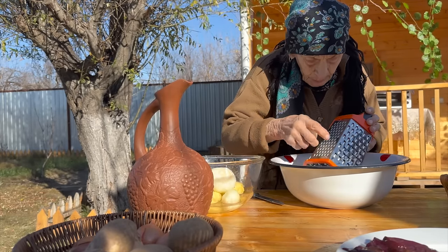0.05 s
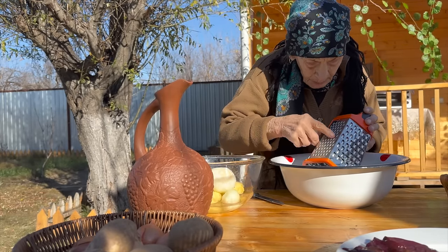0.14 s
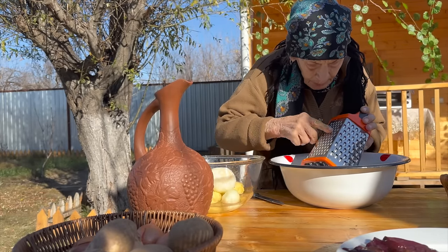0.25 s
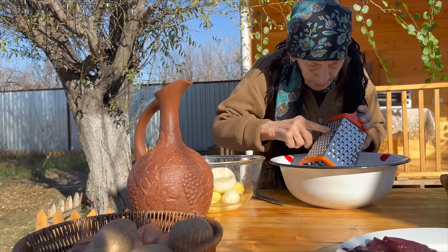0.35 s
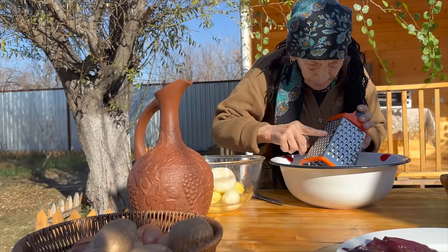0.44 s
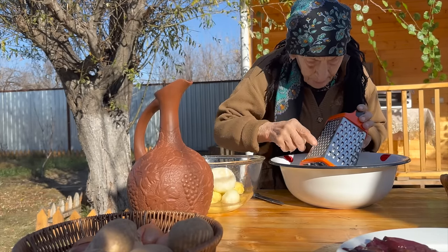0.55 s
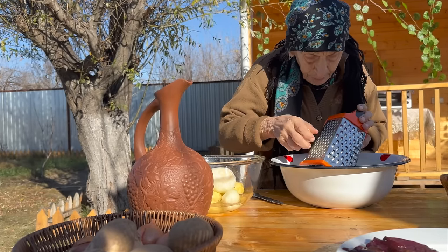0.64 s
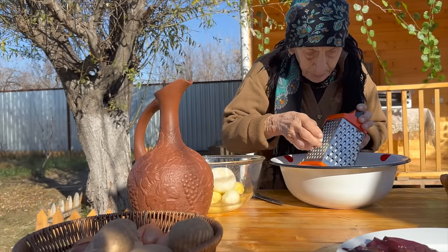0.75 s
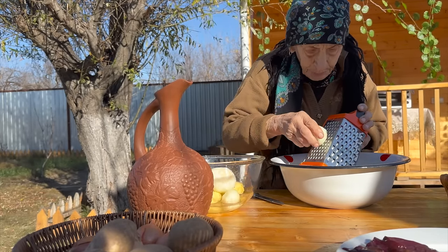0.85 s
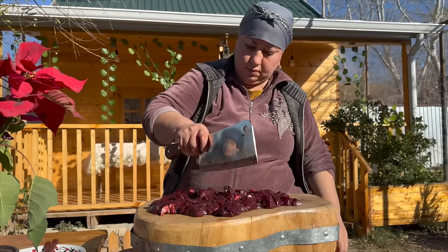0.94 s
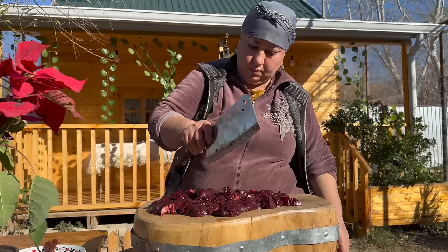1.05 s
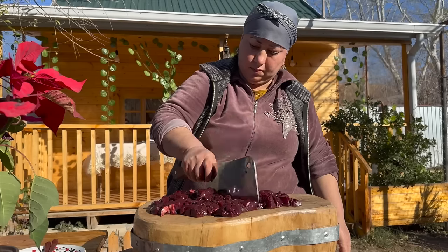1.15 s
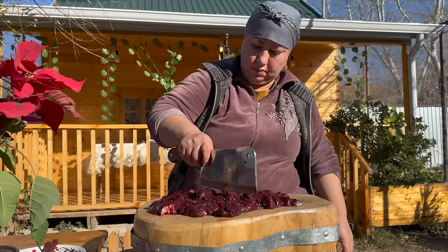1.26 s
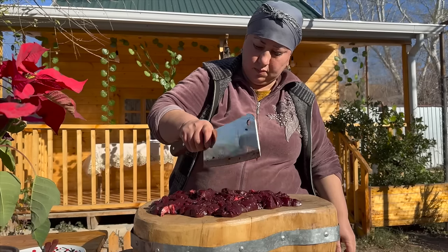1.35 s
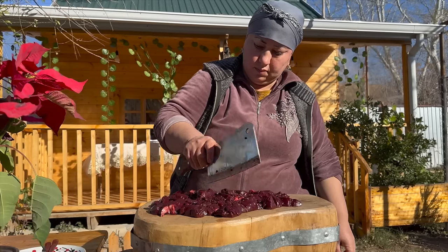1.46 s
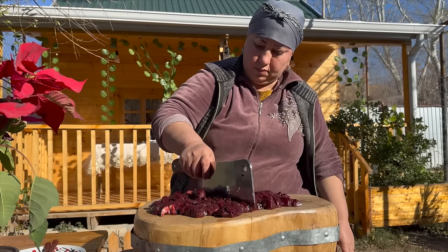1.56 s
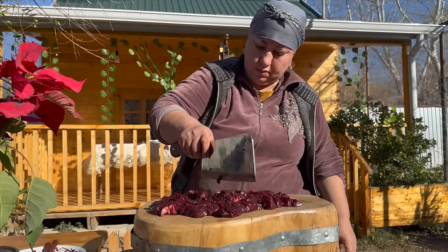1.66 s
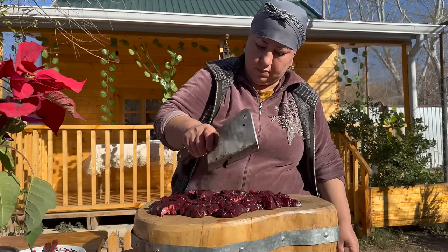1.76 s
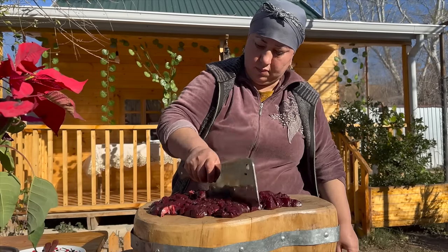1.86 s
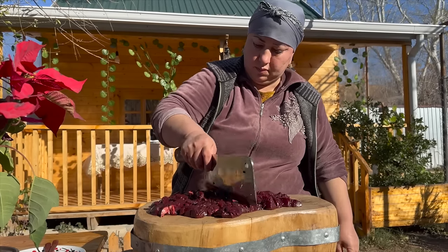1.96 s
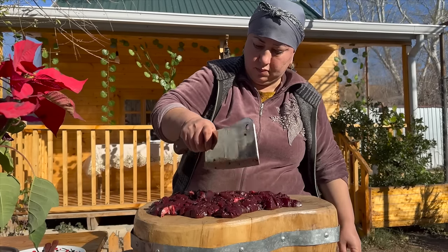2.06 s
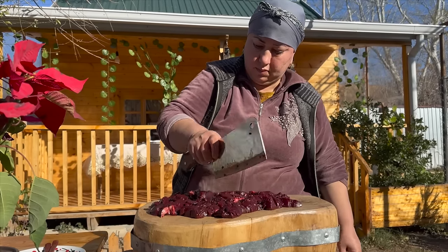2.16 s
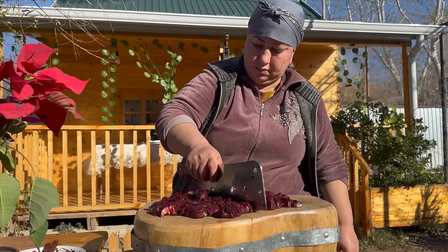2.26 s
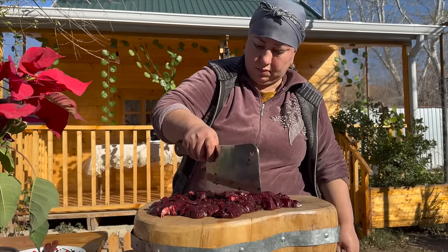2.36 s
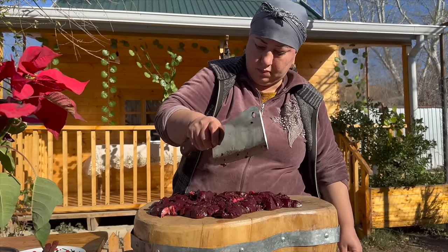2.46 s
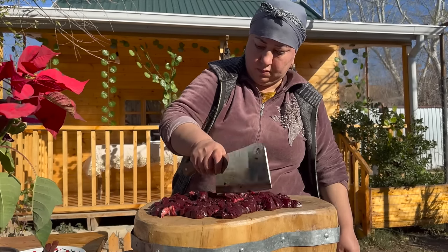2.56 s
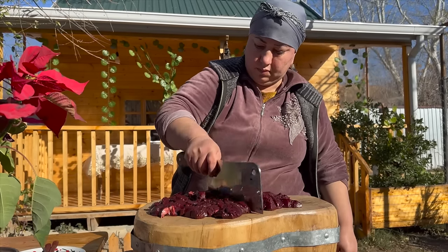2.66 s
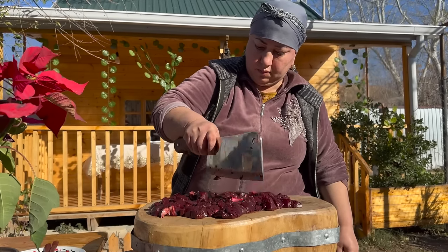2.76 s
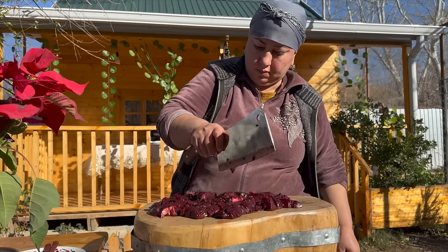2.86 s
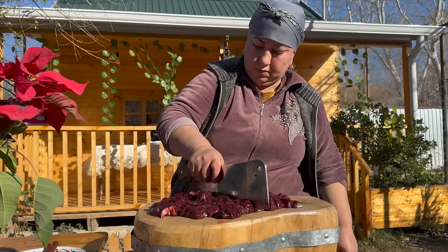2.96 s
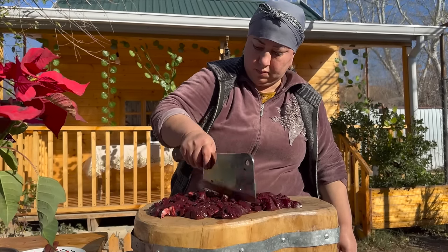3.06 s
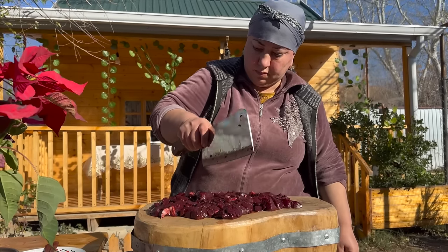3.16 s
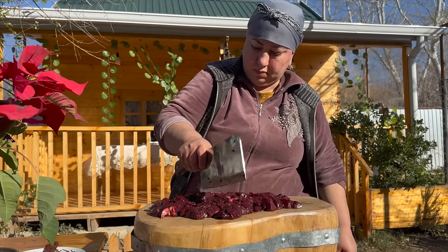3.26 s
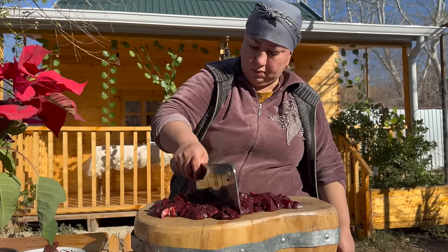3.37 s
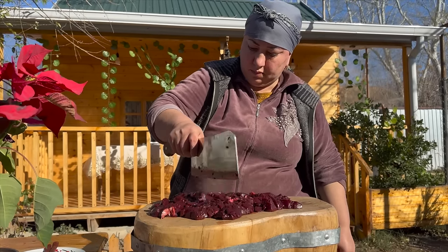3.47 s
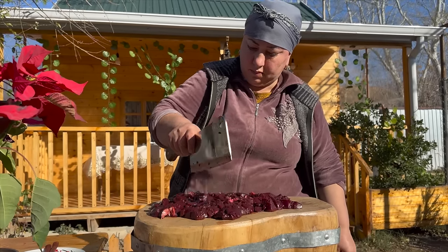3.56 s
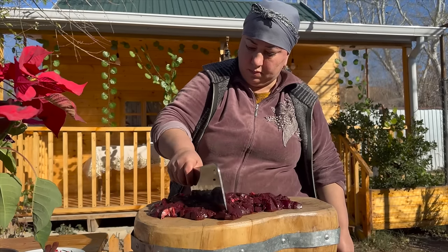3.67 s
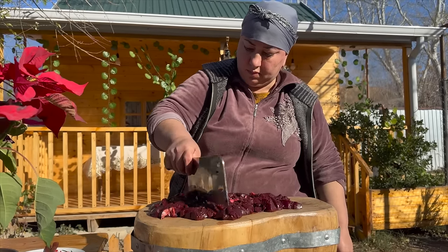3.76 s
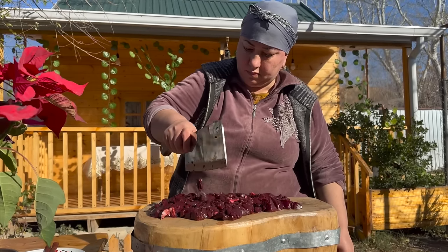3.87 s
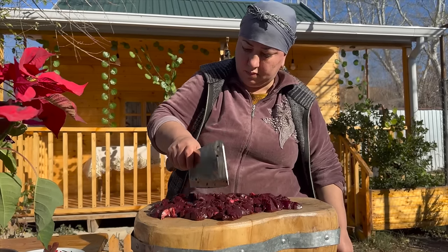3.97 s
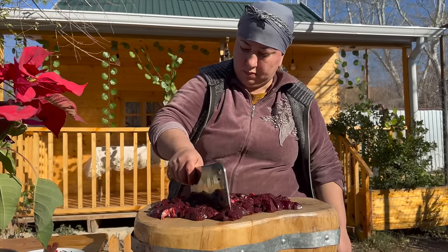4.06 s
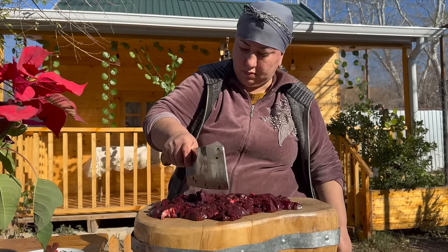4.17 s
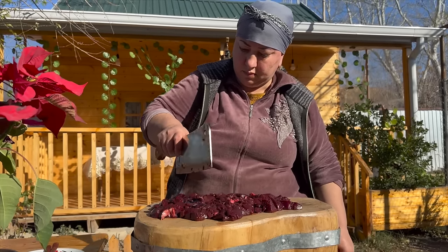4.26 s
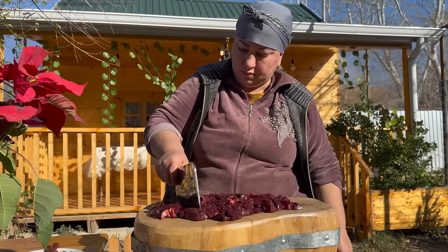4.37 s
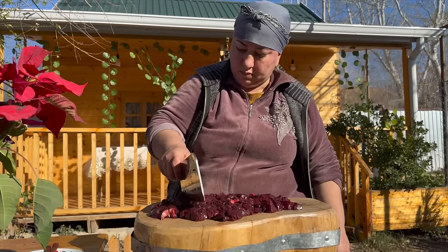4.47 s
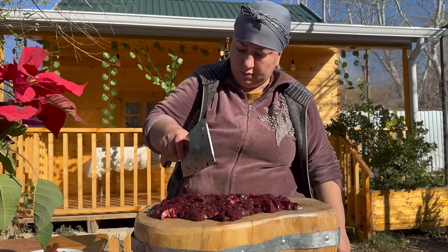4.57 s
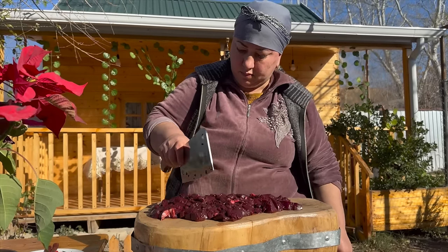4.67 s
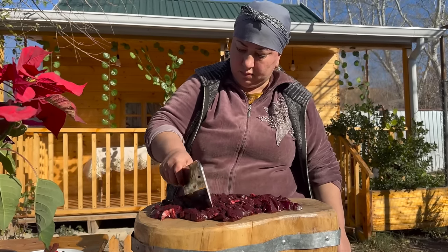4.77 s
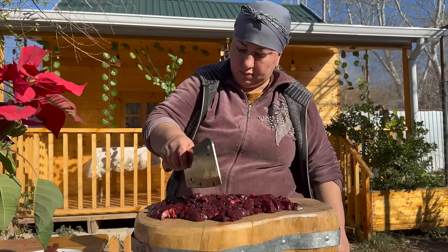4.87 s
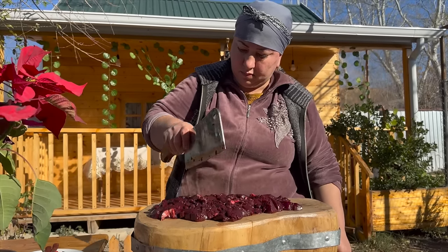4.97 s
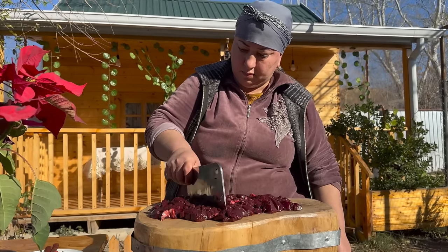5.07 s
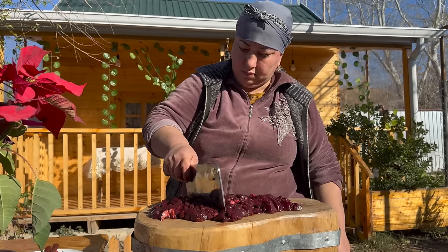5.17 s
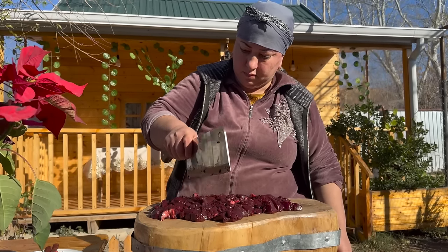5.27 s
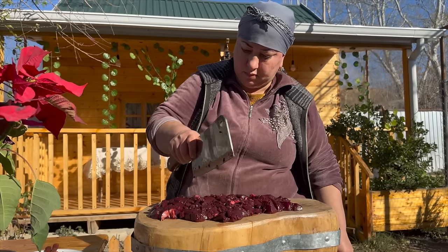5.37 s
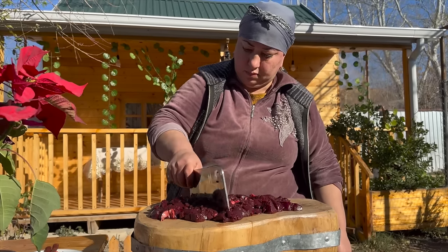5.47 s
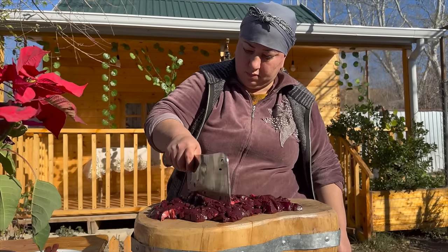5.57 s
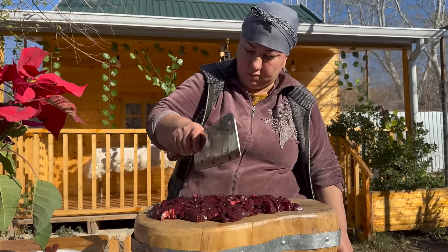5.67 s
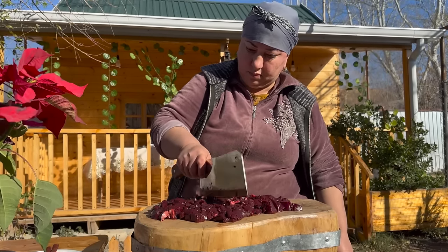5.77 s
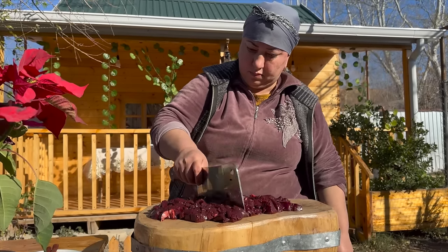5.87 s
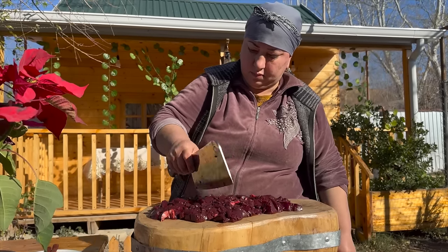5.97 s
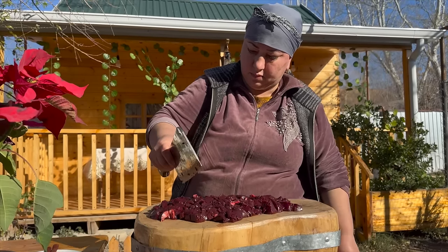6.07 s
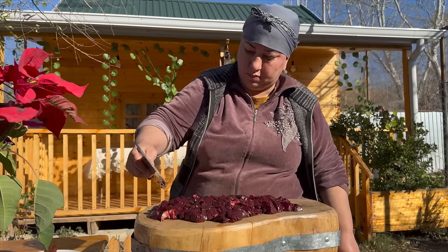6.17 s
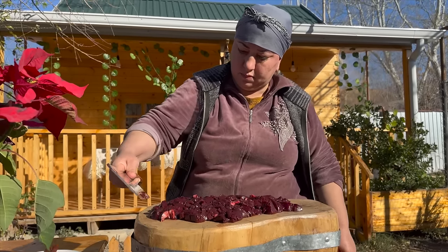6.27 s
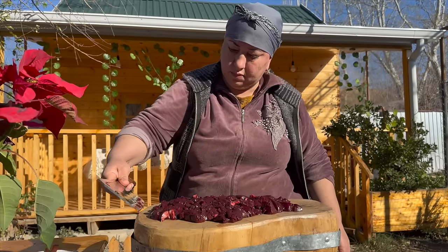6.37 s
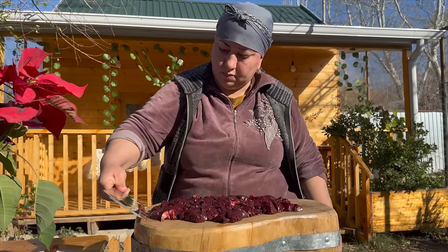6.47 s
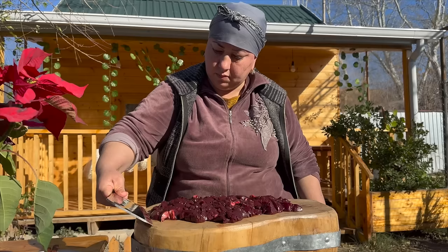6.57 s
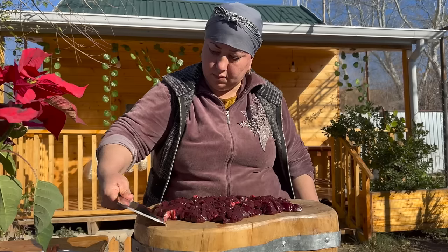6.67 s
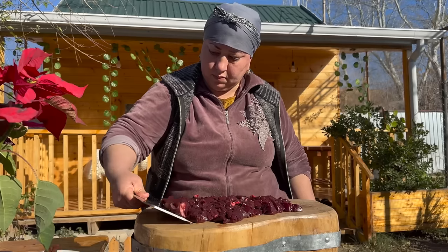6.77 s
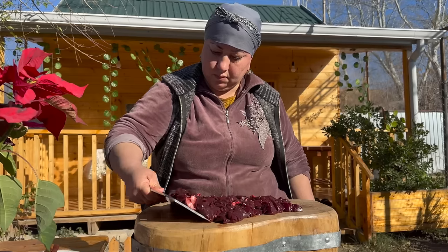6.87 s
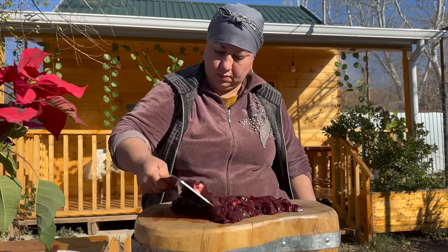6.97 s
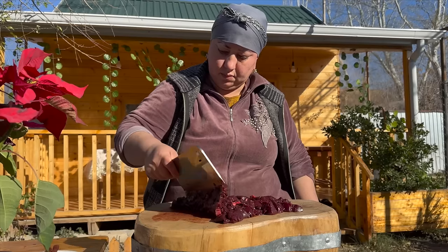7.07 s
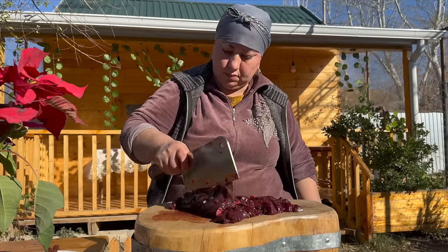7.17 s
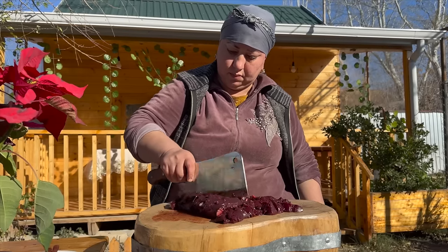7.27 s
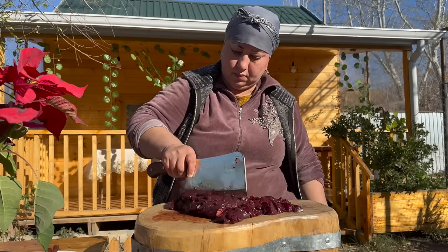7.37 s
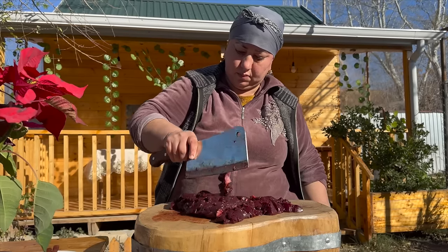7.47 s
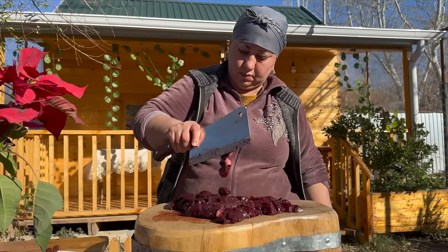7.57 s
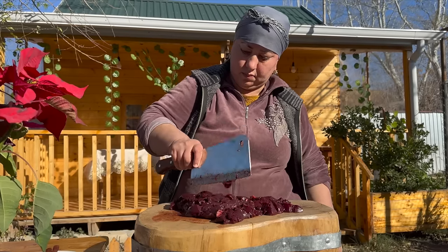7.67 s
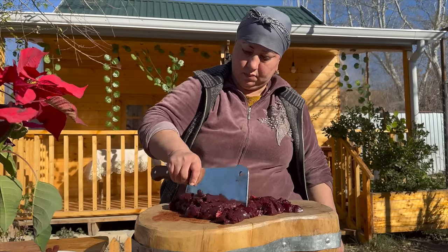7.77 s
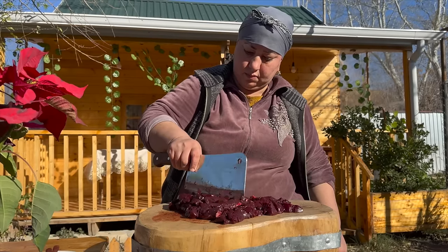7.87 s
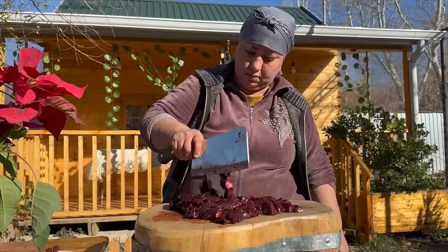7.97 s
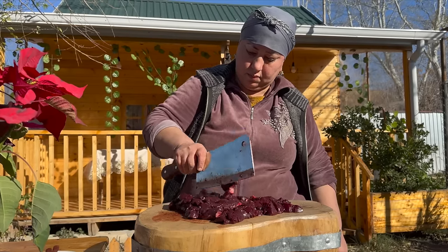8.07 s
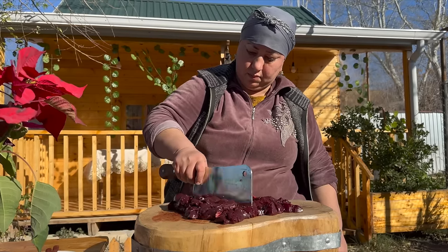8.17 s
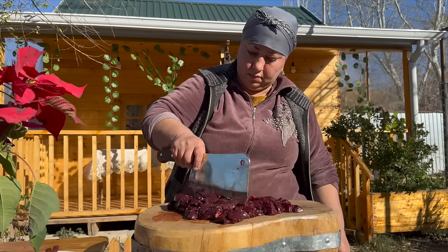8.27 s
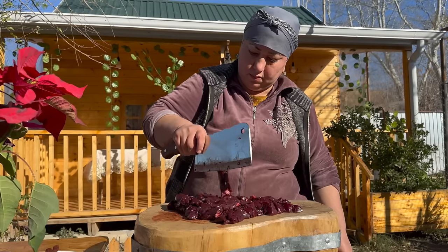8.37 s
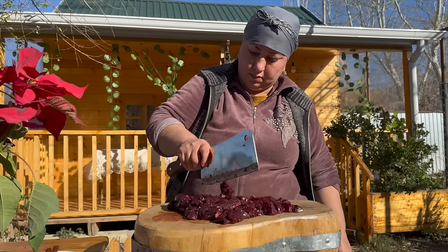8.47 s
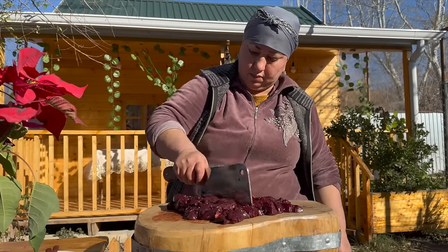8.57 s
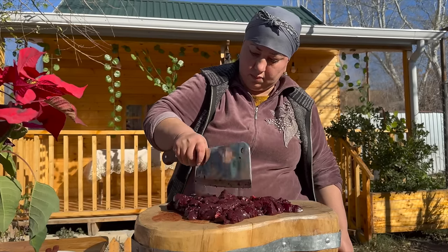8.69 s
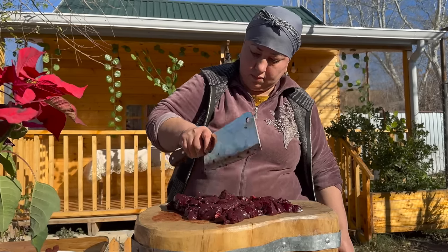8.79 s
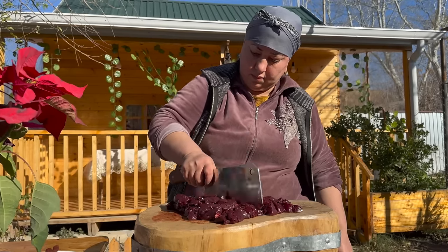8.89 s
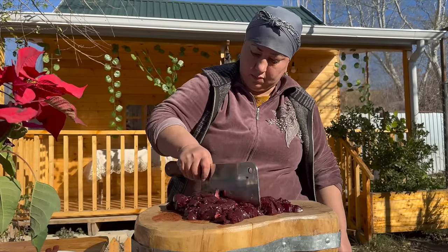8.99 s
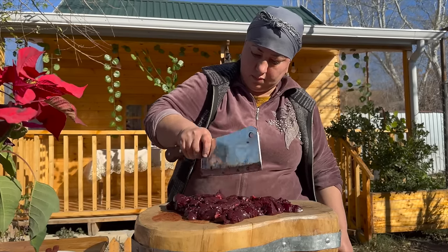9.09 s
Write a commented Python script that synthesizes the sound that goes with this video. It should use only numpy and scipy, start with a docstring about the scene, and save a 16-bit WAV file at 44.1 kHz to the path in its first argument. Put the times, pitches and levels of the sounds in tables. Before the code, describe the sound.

A cleaver steadily chops wet raw liver on a thick wooden block outdoors, pausing once to scrape, with light wind on the microphone.

```python
"""An onion rasps a last stroke over a box grater, then a cleaver chops raw liver on a thick wooden block.
Each chop squelches through the meat, knocks the wood and peels free; the block's stand booms and the
house front answers across the yard. Once, the blade clinks down and scrapes the pile together.
Underneath, light wind rumbles on the microphone, and early on a far bird whistles."""
import sys
import numpy as np
from scipy import signal
from scipy.fft import rfft, irfft, next_fast_len
from scipy.io import wavfile
from scipy.ndimage import uniform_filter1d, map_coordinates

SR = 44100
rng = np.random.default_rng(int(sys.argv[2]) if len(sys.argv) > 2 else 0)


def log_audio(samples):
    """Write samples as a 16-bit WAV file to the path given in sys.argv[1]."""
    # one column per channel
    frames = np.atleast_2d(samples).T
    # limit to full scale, then quantise
    limited = np.clip(frames, -1, 1)
    pcm = np.round(limited * 32767).astype(np.int16)
    wavfile.write(sys.argv[1], SR, pcm)


N = 402633
TIME = np.arange(N) / SR
AGE = np.arange(SR // 2) / SR  # seconds since a contact

# Cue levels are relative: each layer adds its own trim.
# cleaver hits: t/s, force/dB, bite into the wood/dB, squelch/dB, peeling free/dB
CHOP_CUES = [(1.1762, -25.5, 6, -52, -67.5), (1.5396, -27, 0.2, -47, -90), (1.8896, -30, 4, -44, -67.5),
             (2.2542, -31.5, 0.5, -42.5, -73), (2.6218, -25, 3.5, -50, -70.5),
             (2.988, -45.5, 4.5, -40, -69.5), (3.3331, -25, 2.5, -42.5, -73.5),
             (3.6804, -31.5, -1.5, -44.5, -64), (4.0375, -29.5, -2.5, -43.5, -62),
             (4.3917, -34.5, -5, -43, -98), (4.754, -61.5, 11, -44.5, -69.5),
             (5.1099, -22.5, 1.5, -43.5, -68.5), (5.4694, -24.5, 1, -41.5, -75),
             (5.8229, -27, -2, -43.5, -89), (7.752, -67, 17.5, -45, -61), (8.1527, -34, -1, -45, -71.5),
             (8.555, -61, 11, -45.5, -60), (8.9289, -28.5, 0.5, -43, -69.5)]
SNAP_CUES = [(1.172, -19), (1.2376, -44), (2.301, -42), (2.3226, -40.5), (2.7105, -41.5), (4.7403, -25),
             (4.8039, -43.5), (4.8384, -49.5), (6.9723, -50.5), (7.3284, -47.5)]  # the loudest wet films bursting: t/s, peak/dB
SHOVE_CUES = [(6.78, 0.064, -59), (6.89, 0.1917, -73.5), (7.24, 0.0673, -73.5), (7.41, 0.0447, -74)]  # meat shoved together and lifted: t/s, length/s, level/dB
SET_DOWN_CUES = [(6.5537, -37.5)]  # blade set down on the block: t/s, level/dB
CORNER_CUES = [(6.54, 0.0256, -48.5), (6.61, 0.152, -56)]  # blade corner sliding on the wood: t/s, length/s, level/dB
DRAG_CUES = [(6.63, 0.1722, -46.5)]  # edge pressed flat and dragged: t/s, length/s, level/dB
GRATE_CUES = [(0, 0.0982, -60.5), (.19, 0.064, -76.5), (.455, 0.0167, -75), (.505, 0.0262, -67)]  # onion strokes over the teeth: t/s, length/s, level/dB
BUMP_CUES = [(0.769, -57.5, 627, 0.074, -77), (0.803, -40, 183, 0.0333, -81.5),
             (0.9, -89.5, 900, 0.01, -68.5), (1.259, -47.5, 1500, .025, -67),
             (6.223, -46, 260, 0.0206, -66.5), (6.243, -67, 506, 0.044, -66.5)]  # handled things and falling scraps: t/s, level/dB, f/Hz, t60/s, rustle/dB
BIRD_CUES = [(.73, 0.091, 2207, 2195, -72.5), (.815, 0.072, 2196, 2185, -72.5),
             (1.312, .09, 3460, 4232, -66), (1.364, .13, 2964, 4163, -67)]  # far whistles: t/s, length/s, start f/Hz, end f/Hz, level/dB
WIND_CURVE = [(0.0, -56.5), (0.48, -50), (0.79, -56.5), (0.91, -44), (3.36, -42), (3.56, -50),
              (4.22, -39.5), (4.45, -48.5), (8.98, -49), (9.13, -56.5)]  # wind strength: t/s, level/dB

# struck modes: f/Hz, level/dB, t60/s
THUD_MODES = [(211.5, 3, 0.017), (405.3, -3, 0.021), (547, -4.5, 0.014)]  # low body of the block
CLONK_MODES = [(646.06, -7.5, 0.06), (890.3, 4, 0.029), (971, -4, .035)]  # top face of the block
KNOCK_MODES = [(1130, -3, 0.023), (1304.3, 0, 0.028), (1461, -1.5, .028), (1568, 3.5, 0.023),
               (1592.4, -18, 0.11), (1765, 0, 0.0073)]  # cleaver held against the wood
EDGE_MODES = [(2377.2, -7.5, 0.03), (2770, 1, 0.017), (3050, -1, .013), (3546, -4.5, 0.01),
              (3988.6, -3.5, 0.02), (5199, -7, 0.014), (5800, -6, 0.0059)]  # the cleaver's high, quickly damped ring
CLINK_MODES = [(533.4, -10, 0.111), (2463, 1.5, 0.063), (4036, -4.5, 0.0317), (6750, -24.5, 0.044)]  # blade ringing as it is set down

# resonances of rubbed metal: f/Hz, width/Hz, level/dB
CORNER_BANDS = [(260, 127, -10.5), (527.8, 50.3, 0), (900, 295, -14.5), (1435, 137, -12.5),
                (1920, 150, -18.5), (2573, 44.3, 3.5), (3106, 145, -15), (3814, 80, -7), (4470, 237, -13.5),
                (5700, 380, -20), (6602, 61, -14), (7310, 87, -20.5), (8980, 225, -26)]  # blade with only its corner on the wood
FLAT_BANDS = [(218.5, 74, -2.5), (542, 51, -10), (1362, 69.7, 4), (2184, 41, 2.5), (2454, 129, 2.5),
              (2970, 600, -3), (3546, 280, 1.5), (4023, 170, 1), (5394, 320, -4), (6725, 114, -3.5),
              (7065, 115, -5.5), (9500, 1050, -22.5)]  # blade pressed flat along its edge
GRATER_BANDS = [(260, 316, -4.5), (706, 80, 2.5), (1070, 396, -3), (2210, 88, -8), (2470, 67, 2.5),
                (3390, 118, -8), (3727, 76, 1), (4700, 97, -10.5), (4930, 120, -16.5), (5650, 237, -12),
                (6384, 142, -12), (7210, 183, -18), (8650, 140, -32)]  # the grater's sheet metal

# EQ curves: f/Hz, level/dB
CRACK_EQ = [(700, -19.5), (1500, 0.5), (2300, 3), (3000, 0), (4000, -3.5), (5500, -6), (7000, -12),
            (10000, -21), (16000, -27)]  # wood fibres cracking
SQUELCH_EQ = [(150, -16.5), (400, -9), (1000, 1), (2500, -1), (4000, -1), (6000, -8), (9000, -11),
              (15000, -11)]  # liver squeezed by the blade
PEEL_EQ = [(400, -25), (1500, -2.5), (3500, -7), (7000, -5), (10000, -3), (15000, -7.5)]  # wet meat pulling loose
RUMBLE_EQ = [(10, 0.5), (28, 3.5), (48, -5.5), (70, -12.5), (130, -27.5), (500, -71)]  # wind on the microphone
AIR_EQ = [(60, 4), (150, 3.5), (300, -3), (700, -5.5), (1400, -8.5), (2200, -16), (4300, -21.5),
          (6000, -28.5), (10000, -28.5), (14500, -30), (16000, -40.5)]  # countryside hush
GROUND_EQ = [(80, -12.5), (200, 3.5), (500, 5), (1500, 1.5), (2300, -7), (4000, -13.5), (7000, -17),
             (15000, -2)]  # near reflections off the ground
PORCH_EQ = [(80, -10), (200, 5), (500, 11.5), (1500, 2), (2300, -4.5), (4000, -4.5), (7000, -18.5),
            (15000, -15.5)]  # porch reflections
FAR_EQ = [(100, -2.5), (300, -6.5), (800, 4.5), (1600, 4.5), (4000, -11.5), (6000, -15.5), (12000, -25.5)]  # far reflections
WASH_EQ = [(100, -9), (300, 2.5), (800, 4.5), (1600, 1.5), (2400, -3), (4000, -8.5), (5500, -18),
           (8000, -26), (15000, -35)]  # diffuse wash off the house front and fences


def chops(clonk_db=-3, knock_db=-2, edge_db=-6, crack_db=-5, ground_db=-15, wash_db=6):
    """The block thuds and clonks, the steel knocks, fibres crack. A clean bite trades clonk for crack."""
    track = np.zeros(N)
    firm_db, knock_slope = -29, 1.3  # force of an ordinary chop; dB of knock per dB of force
    fast_attack, slow_attack = 1 - fade(0.0063), 1 - fade(0.016)  # the steel takes a moment to bite
    splinter = fade(0.015) * (1 - fade(0.051))
    thud_eq = [(40, -16.5), (130, -1.5), (700, 7.5), (2000, -15.5)]
    for s, force, bite, _, _ in CHOP_CUES:
        thud = unit_hit(eq(ring(THUD_MODES, scatter_db=1, detune=0), thud_eq))
        clonk = unit_hit(ring(CLONK_MODES, scatter_db=3, detune=0.033) * fast_attack)
        steel = unit_hit(ring(KNOCK_MODES, scatter_db=3.5, detune=0.016) * fast_attack)
        edge = unit_hit(ring(EDGE_MODES, scatter_db=5.5, detune=0.049) * slow_attack)
        fibres = unit_hit(eq(noise() * splinter, CRACK_EQ))
        wood = amp(force) * (thud + amp(clonk_db - bite) * clonk)
        knock = amp(firm_db + knock_slope * (force - firm_db) + knock_db) * steel
        blow = wood + knock + amp(force + bite) * (amp(edge_db) * edge + amp(crack_db) * fibres)
        ground = eq(noise() * fade(0.071) * (1 - fade(0.0089)), GROUND_EQ)
        scatter = amp(ground_db) * convolve(blow, unit_energy(ground))
        tail = amp(force) * (stand_boom() + amp(wash_db) * yard_wash())
        add(track, s, blow + scatter + tail)
    return track


def stand_boom(hz=346.1, boom_db=-17, delay_s=0.024, swell_s=0.022, t60=0.23):
    """The stand takes up the blow, swells and dies away with a slight rattle."""
    swell = stroke(delay_s, swell_s, attack_s=swell_s / 2, release_t60=t60, t=AGE)
    rattle = 0.25 * wobble(600)
    return amp(boom_db) * swell * np.sin(2 * np.pi * hz * AGE + rattle)


def liver(squelch_db=4, cling_db=-79, peel_db=1, settle_db=-86):
    """Meat squelches just ahead of the hit, crackles on the resting blade and sucks loose as it lifts."""
    track = np.zeros(N)
    lead_s = 0.04
    t = AGE - lead_s  # zero where the edge meets the wood
    heaped_at_s, flat_cut_s, heap_cut_s = 7.2, 0.0095, 0.02097  # the deeper heap takes longer to cut
    rise_s, stop_s, touch_s = 0.0076, 0.0017, 0.005
    peel_delay_s, peel_width_s = 0.106, 0.015
    ease_in = np.exp(np.clip(-(t + 0.0061) / rise_s, -50, 50))
    choke = np.exp(np.clip((t - 0.001) / stop_s, -50, 50))
    squeeze = 1 / (ease_in + choke + 0.5)  # swells, then stops dead on the wood
    cling = amp(cling_db) * stroke(s=0.025, length=0.085, attack_s=0.012, release_t60=0.2, t=t)
    lift = np.exp(-0.5 * ((t - peel_delay_s) / peel_width_s) ** 2)
    for s, _, _, squelch, peel in CHOP_CUES:
        cut_s = heap_cut_s if s > heaped_at_s else flat_cut_s
        entry = 0.5 + 0.5 * np.tanh((t + cut_s) / touch_s)  # the edge touches the top of the pile
        juice = unit(eq(grains(rate=2900, hiss=0.929), SQUELCH_EQ))
        cut = amp(squelch + squelch_db) * entry * squeeze * juice
        crackle = cling * wet_ticks(rate=230, hz=9000, spread=0.35, hiss=0.25, cycles=1.2)
        suck = amp(peel + peel_db) * lift * wet_ticks(rate=610, hz=4300, spread=0.54, hiss=0.22)
        add(track, s - lead_s, cut + crackle + suck)
    shove = strokes(SHOVE_CUES, attack_s=0.0238, release_t60=0.31)
    smear = wet_ticks(rate=330, hz=6986, spread=0.479, hiss=0.444, size=N)
    sag = wet_ticks(rate=20, hz=8980, spread=0.486, hiss=0, size=N)  # the fresh heap ticks as it settles
    return track + shove * smear + amp(settle_db) * (TIME > heaped_at_s) * sag


def film_snaps(snap_db=-1, t60=0.0062, pitch_hz=5000, spray=0.712):
    """Single wet films burst, each a short tick at its own pitch."""
    track = np.zeros(N)
    for s, db in SNAP_CUES:
        hz = pitch_hz * np.exp(0.22 * rng.standard_normal())
        tick = eq(fade(t60) * (np.sin(2 * np.pi * hz * AGE) + spray * noise()), PEEL_EQ)
        add(track, s, amp(db + snap_db) * tick / np.abs(tick).max())
    return track


def blade_scrape(drag_db=1, grit_db=-13, crack_db=-14.5):
    """The blade clinks down on its corner, is pressed flat and rasps over the wet wood."""
    slide = strokes(CORNER_CUES, attack_s=0.0297, release_t60=0.161)
    drag = amp(drag_db) * strokes(DRAG_CUES, attack_s=0.1562, release_t60=0.215)
    corner = unit(resonate(grains(rate=500, hiss=0.63, size=N), CORNER_BANDS))
    rasp = unit(resonate(grains(rate=1400, hiss=0.67, size=N), FLAT_BANDS))
    grit = wet_ticks(rate=640, hz=8030, spread=0.29, hiss=0.34, size=N)
    track = slide * corner + drag * (rasp + amp(grit_db) * grit)
    for s, db in SET_DOWN_CUES:
        contact = noise() * fade(0.043)
        clink = unit_hit(ring(CLINK_MODES, scatter_db=2, detune=0))
        clatter = unit_hit(resonate(contact, CORNER_BANDS))
        crack = amp(crack_db) * unit_hit(eq(contact, CRACK_EQ))
        add(track, s, amp(db) * (clink + clatter + crack))
    return track


def grater(grate_db=1):
    """Onion catches on many small teeth, which ring the sheet metal."""
    pressure = amp(grate_db) * strokes(GRATE_CUES, attack_s=0.0072, release_t60=0.18)
    return pressure * unit(resonate(grains(rate=1200, hiss=0.62, size=N), GRATER_BANDS))


def bumps():
    """Handled things and falling scraps knock softly, each with a brief rustle."""
    track = np.zeros(N)
    for s, db, hz, t60, rustle_db in BUMP_CUES:
        knock = fade(t60) * np.sin(2 * np.pi * hz * AGE)
        rustle = unit_hit(eq(grains(rate=2600, hiss=0.56) * fade(0.078), SQUELCH_EQ))
        add(track, s, amp(db) * knock + amp(rustle_db) * rustle)
    return track


def yard_wash(porch_db=-23, porch_t60=0.22, far_db=-38, far_t60=0.75, uneven_db=2.5):
    """A blow thrown in all directions comes back from the yard as a dull, uneven wash."""
    porch = unit_hit(eq(noise() * fade(porch_t60), WASH_EQ)) * (1 - fade(0.044))
    far = unit_hit(eq(noise() * fade(far_t60), WASH_EQ)) * (1 - fade(0.2))
    clumps = amp(uneven_db * wobble(300))  # echoes arrive in bunches
    return clumps * (amp(porch_db) * porch + amp(far_db) * far)


def yard_reverb(x, ground_db, porch_db, far_db):
    """The ground scatters at once; house and fences add a faint, short echo; the porch rings longest."""
    ground = unit_energy(eq(noise() * fade(0.17) * (1 - fade(0.045)), GROUND_EQ))
    porch = unit_energy(eq(noise() * fade(1.0) * (1 - fade(0.14)), PORCH_EQ))
    far = unit_energy(eq(noise() * fade(0.35) * (1 - fade(0.24)), FAR_EQ))
    return x + convolve(x, amp(ground_db) * ground + amp(porch_db) * porch + amp(far_db) * far)


def bird(glide_s=0.012, waver=0.0078):
    """A far bird's thin, wavering whistles slide to their pitch and echo round the yard."""
    track = np.zeros(N)
    for s, length, from_hz, to_hz, db in BIRD_CUES:
        glide = to_hz + (from_hz - to_hz) * np.exp(-(AGE / glide_s) ** 2)
        hz = glide * (1 + waver * wobble(150))
        swell = (1 - fade(0.05)) * np.clip(1 - AGE / length, 0, 1)
        add(track, s, amp(db) * swell * np.sin(2 * np.pi * np.cumsum(hz) / SR))
    return yard_reverb(track, ground_db=-8, porch_db=-4.5, far_db=-8.5)


def wind(wind_db=-1.5, gust_db=3.5, gust_rate=7):
    """Wind buffets the microphone in quick random gusts."""
    s, db = np.transpose(WIND_CURVE)
    strength = amp(wind_db + np.interp(TIME, s, db))
    gusts = map_coordinates(rng.standard_normal(200), [TIME * gust_rate], mode="mirror")
    return strength * unit(amp(gust_db * gusts) * eq(noise(N), RUMBLE_EQ))


def air(air_db=-73):
    """A faint, steady bed of countryside hush."""
    return amp(air_db) * unit(eq(noise(N), AIR_EQ))


def ring(modes, scatter_db, detune):
    """Damped modes whose strength and pitch vary at random, as with where a blow lands."""
    chance = rng.standard_normal((len(modes), 2))
    return sum(amp(db + scatter_db * a) * fade(t60) * np.sin(2 * np.pi * hz * (1 + detune * b) * AGE)
               for (hz, db, t60), (a, b) in zip(modes, chance))


def wet_ticks(rate, hz, spread, hiss, cycles=2.5, size=len(AGE)):
    """Sticky ticks, rate a second, pitched around hz and falling to 1/e in cycles, over a fine hiss."""
    count = max(int(rate * size / SR), 1)
    start = rng.integers(0, size, count)
    detune, strength = rng.standard_normal((count, 2)).T
    pitch = np.clip(hz * np.exp(spread * detune), 500, 19000)
    turns = pitch[:, None] * AGE[:SR // 200]
    ticks = strength[:, None] * np.exp(-turns / cycles) * np.sin(2 * np.pi * turns)
    where = start[:, None] + np.arange(turns.shape[1])
    crackle = np.bincount(where.ravel(), ticks.ravel(), size)[:size]
    return unit(unit(crackle) + hiss * unit(eq(noise(size), PEEL_EQ)))


def grains(rate, hiss, size=len(AGE)):
    """Tiny random clicks, rate a second, on a share of smooth hiss."""
    clicks = (rng.random(size) < rate / SR) * noise(size)
    return unit(unit(clicks) + hiss * noise(size))


def noise(size=len(AGE)):
    """White noise."""
    return rng.standard_normal(size)


def wobble(samples):
    """Random drift at rms 1, smoothed over this many samples."""
    return unit(uniform_filter1d(noise(), size=samples))


def stroke(s, length, attack_s, release_t60, t=TIME):
    """Pressure envelope: builds from time s, holds and lets go at s + length."""
    attack = np.clip((t - s) / attack_s, 0, 1) ** 2
    return attack * np.exp(-np.log(1000) * np.maximum(t - s - length, 0) / release_t60)


def strokes(cues, attack_s, release_t60):
    """Gain envelope of hand movements cued as t/s, length/s, level/dB."""
    return sum(amp(db) * stroke(s, length, attack_s, release_t60) for s, length, db in cues)


def fade(t60):
    """Decay by 60 dB in t60 seconds; 1 - fade makes an attack."""
    return np.exp(-np.log(1000) * AGE / t60)


def eq(x, curve):
    """Minimum-phase EQ through f/Hz, level/dB points."""
    m = 2 ** 14 if len(x) == N else 2 ** 11
    hz, db = np.transpose(curve)
    gain = amp(np.interp(np.log(np.fft.rfftfreq(m, 1 / SR) + 1), np.log(hz), db))
    cepstrum = irfft(np.log(gain), m)
    cepstrum[1:m // 2] *= 2  # folded forward, so nothing rings ahead of a hit
    cepstrum[m // 2 + 1:] = 0
    return convolve(x, irfft(np.exp(rfft(cepstrum)), m)[:m // 2])


def resonate(x, bands):
    """Pass x through a bank of resonances of alternating polarity."""
    m = 2 ** 12
    f = np.fft.rfftfreq(m, 1 / SR)
    body = sum((-1) ** k * amp(db) * 1j * f * width / (hz * hz - f * f + 1j * f * width)
               for k, (hz, width, db) in enumerate(bands))
    return convolve(x, irfft(body, m)[:m // 2])


def convolve(x, response):
    """Apply an impulse response, keeping the length of x."""
    return signal.oaconvolve(x, response)[:len(x)]


def amp(db):
    """Decibels to gain."""
    return 10 ** (np.asarray(db) / 20)


def unit(x):
    """Scale to rms 1."""
    return x / np.sqrt(np.mean(x ** 2) + 1e-20)


def unit_hit(x):
    """Scale to rms 1 over the first 20 ms."""
    return x / np.sqrt(np.mean(x[:SR // 50] ** 2) + 1e-20)


def unit_energy(x):
    """Scale to total energy 1."""
    return x / np.sqrt(np.sum(x ** 2))


def add(track, s, x):
    """Mix x into the track at time s."""
    start = max(round(s * SR), 0)
    track[start:start + len(x)] += x[:N - start]


def scene():
    """Mono mix: chops up front, small foley with a touch of yard, bird, wind and air behind."""
    foley = liver() + film_snaps() + blade_scrape() + grater() + bumps()
    foreground = chops() + yard_reverb(foley, ground_db=-17, porch_db=-27.5, far_db=-37.5)
    return (foreground + bird() + wind() + air())[None]


def record(dry, top_hz=16400, slope_hz=700):
    """A steep high cut takes off the very top of the treble."""
    m = next_fast_len(N + SR // 2)
    gain = np.clip((top_hz - np.fft.rfftfreq(m, 1 / SR)) / slope_hz, 0, 1)
    return irfft(rfft(dry, m) * gain, m)[..., :N]


dry = scene()
out = record(dry)
log_audio(out)
```